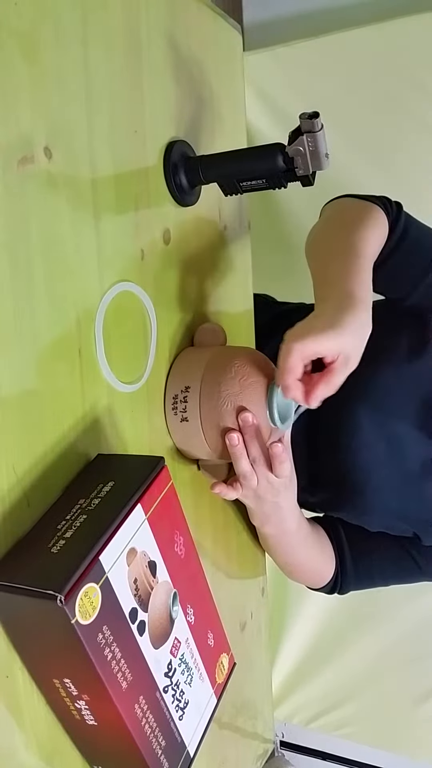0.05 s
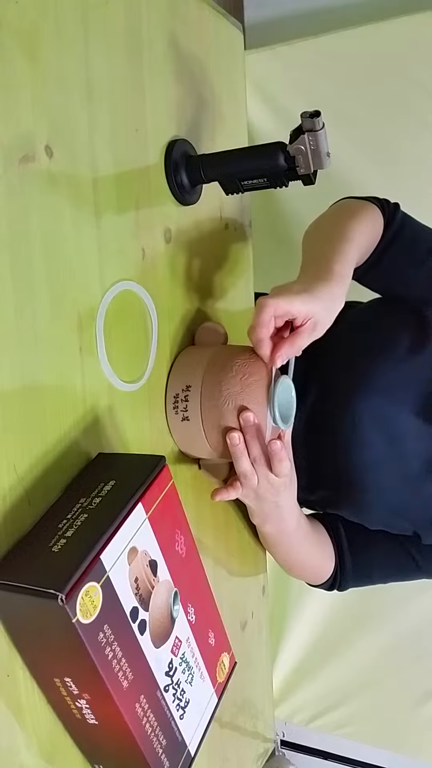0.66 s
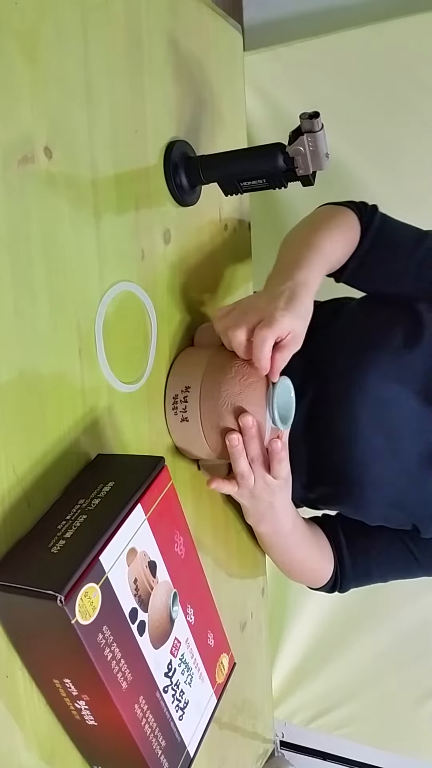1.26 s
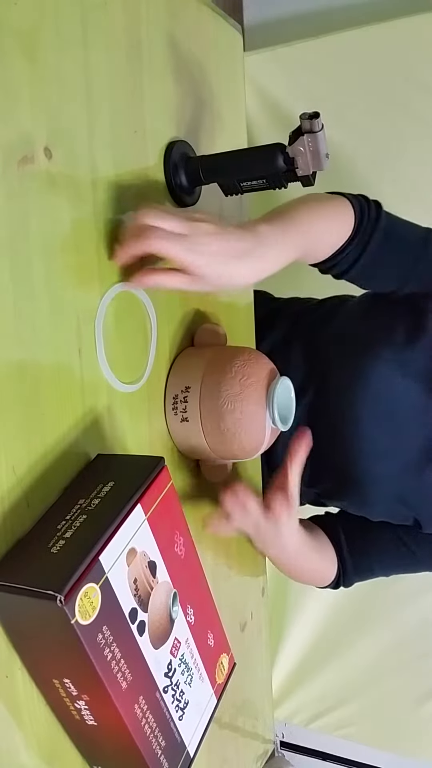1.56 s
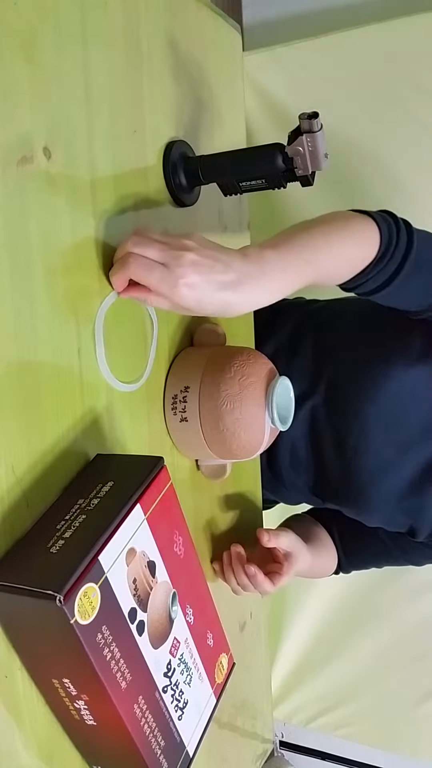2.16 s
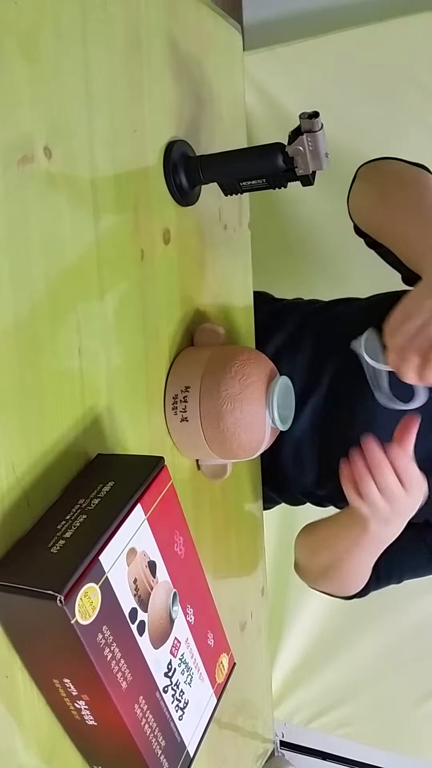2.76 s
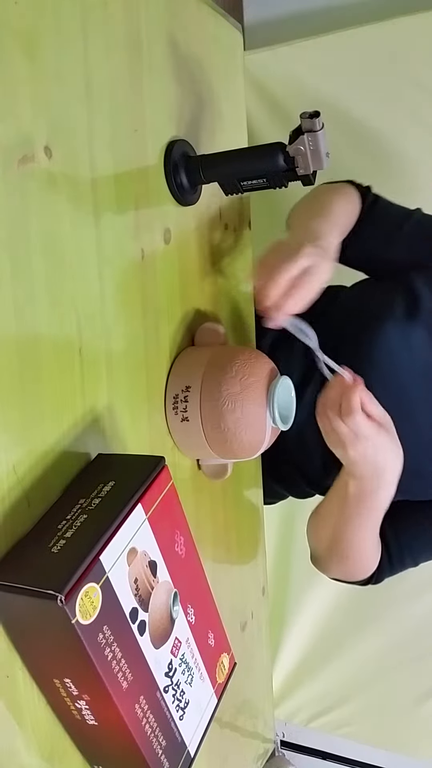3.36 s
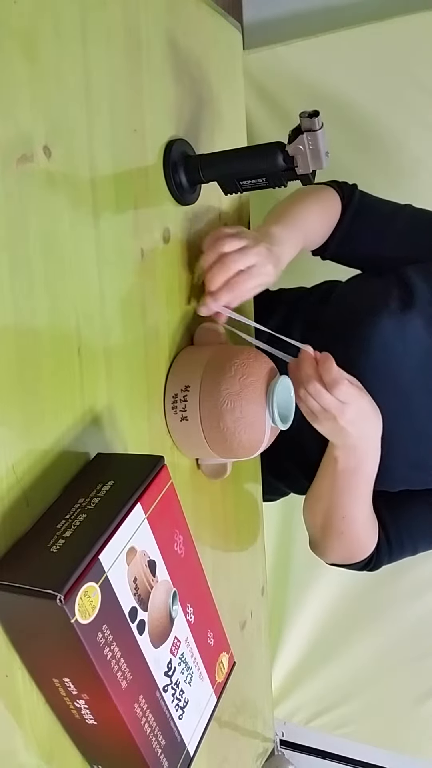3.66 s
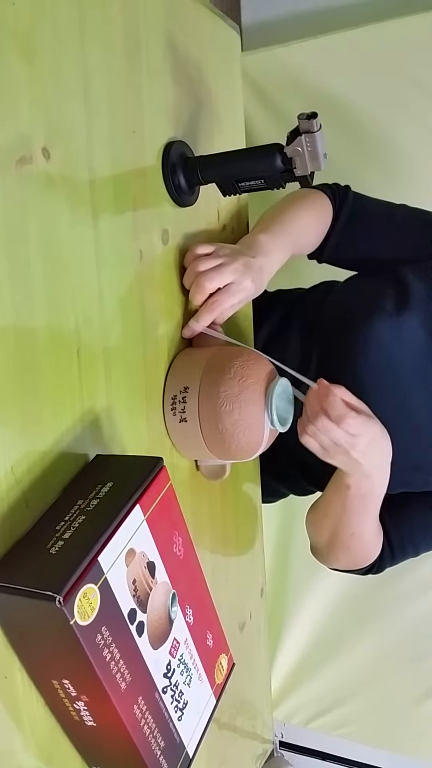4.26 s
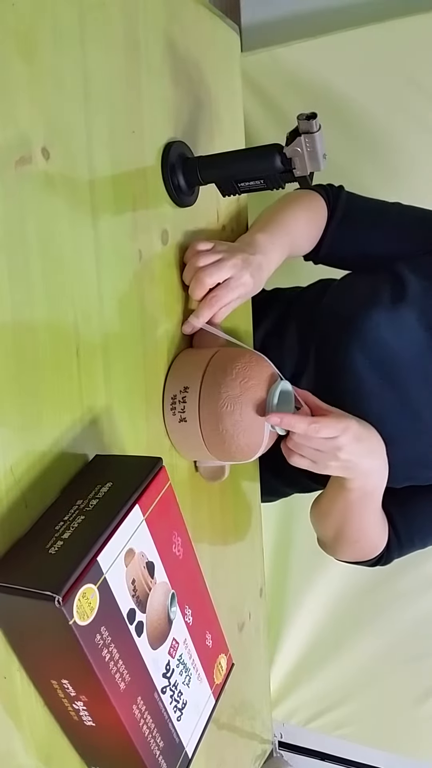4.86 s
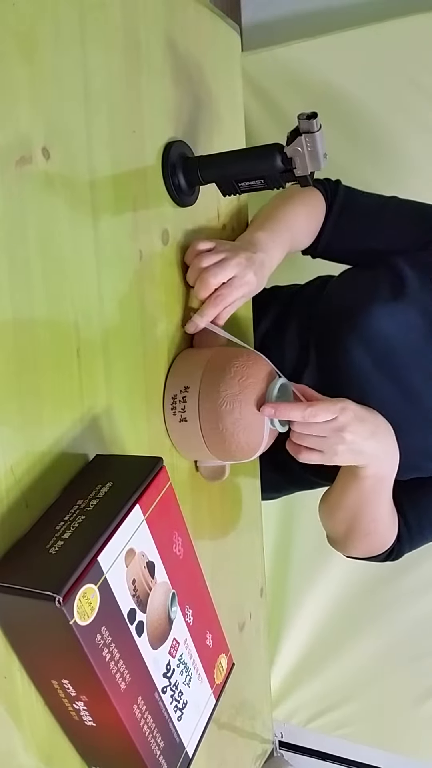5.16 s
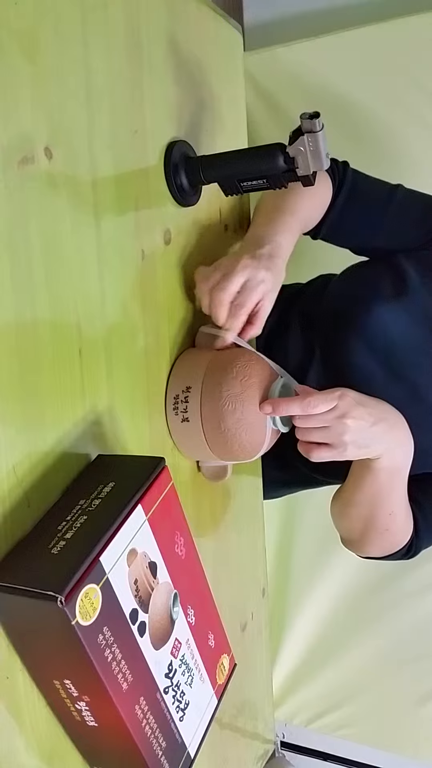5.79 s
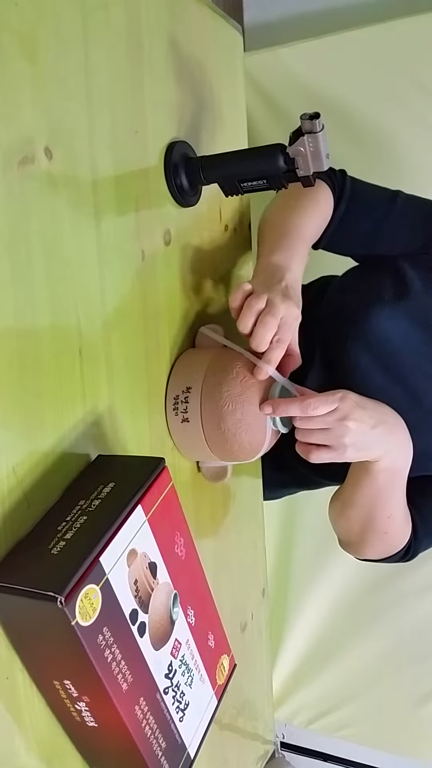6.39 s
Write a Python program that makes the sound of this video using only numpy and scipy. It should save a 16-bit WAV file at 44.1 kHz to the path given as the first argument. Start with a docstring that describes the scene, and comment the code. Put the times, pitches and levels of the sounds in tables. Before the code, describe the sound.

A rubber band snaps off a clay pot, then the lid scrapes and clinks and the pot knocks on a wooden table.

```python
"""In a small, faintly humming room a far clock ticks. A rubber band slides off a lidded clay pot and snaps
free, thudding the pot on its wooden table; two dull bumps come through the microphone stand. A second band
is stretched over the pot: under its pull the lid grates and clinks on its rim, and the pot judders, tips
and knocks back on the table, the room ringing briefly. Last, the band rubs up over the hollow clay,
with one more bump and a few light knocks."""
import sys
import numpy as np
from scipy import signal
from scipy.fft import rfft, irfft, next_fast_len
from scipy.io import wavfile
from scipy.ndimage import map_coordinates

SR = 44100
rng = np.random.default_rng(int(sys.argv[2]) if len(sys.argv) > 2 else 0)


def unload_audio(sound):
    """Save the sound as a 16-bit wav file, at the path given as the first command line argument."""
    columns = np.transpose(np.atleast_2d(sound))
    # keep every value between -1 and 1, then stretch to whole-number steps
    steps = np.round(np.clip(columns, -1, 1) * 32767)
    wavfile.write(sys.argv[1], SR, steps.astype(np.int16))


N = 283563
T = np.arange(SR // 2) / SR  # seconds after a contact
ECHO_S, ECHO_DB = 0.021, -7  # a softer echo follows 21 ms later
HARD_BLOW_DB = -19.5  # the blow at which rattle and woody edge have their stated levels

# Tone of rubber brushing clay. Each row: frequency in Hz, noise level in dB.
RUBBER_SWISH = [(500, 14.5), (2400, -3.5), (3100, -11.5), (3800, -4.5), (5500, -8.5), (7000, 0.5),
                (8800, -0.5), (11500, -9), (14500, -11)]
# Tone of grains crushed on clay. Each row: frequency in Hz, noise level in dB.
CLAY_RASP = [(1500, 1.5), (2500, 3), (3500, -7.5), (4500, -7.5), (5200, 1), (6000, -16.5), (7300, -8.5),
             (8500, 8), (9300, -10), (11300, -13.5), (12300, 2.5), (13200, -7), (14600, -9)]
# Stereo image of reverb, rattle and woody edge. Each row: frequency in Hz, left-right likeness (1 is mono).
STEREO_LIKENESS = [(150, 0.84), (500, 0.95), (900, 0.59), (1600, 0.61), (3000, 0.018)]


def amp(db):
    """Decibels to gain."""
    return 10 ** (np.asarray(db) / 20)


def unit(x):
    """Scale to rms 1."""
    return x / np.sqrt(np.mean(x ** 2) + 1e-20)


def burst(x, axis=None):
    """Scale a short sound to the energy of 30 ms at rms 1."""
    return x / np.sqrt(np.mean(x ** 2, axis=axis, keepdims=True) * x.shape[-1] / (.03 * SR) + 1e-20)


def along(points, hz):
    """Read a curve of (Hz, value) points on a log frequency axis."""
    freqs, values = np.transpose(points)
    return np.interp(np.log(hz + 1), np.log(freqs + 1), values)


def fade(t60):
    """Decay by 60 dB in t60 seconds."""
    return amp(-60 * T / t60)


def swell(rise):
    """Force of a contact: it peaks after rise seconds, then lets go."""
    u = T / rise
    return u * np.exp(1 - u)


def wobble(rate):
    """A smooth random curve, rate knots a second."""
    return map_coordinates(rng.standard_normal(512), [np.arange(N) * rate / SR], mode="wrap")


def strokes(rows, attack_s, release_s):
    """One envelope per level column: each stroke rises, holds, then falls 60 dB in the release time."""
    t, total = np.arange(N) / SR, 0
    for start, length, *levels_db in rows:
        attack = np.clip((t - start) / attack_s, 0, 1)
        release = amp(-60 * np.maximum(t - start - length, 0) / release_s)
        total = total + np.outer(amp(levels_db), attack * release)
    return total


def add(track, s, x):
    """Mix x into the track at s seconds."""
    start = round(s * SR)
    part = track[:, start:start + x.shape[-1]]
    part += x[..., :part.shape[1]]


def filtered(x, response):
    """Zero-phase EQ; response gives the gain at each frequency."""
    size = next_fast_len(x.shape[-1] + SR // 4)
    gain = response(np.fft.rfftfreq(size, 1 / SR))
    return irfft(rfft(x, size) * gain, size)[..., :x.shape[-1]]


def coloured(x, tone, size=2048):
    """Minimum-phase EQ along (Hz, dB) points, so that attacks stay sharp."""
    cepstrum = irfft(np.log(amp(along(tone, np.fft.rfftfreq(size, 1 / SR)))))
    cepstrum[1:size // 2] *= 2
    cepstrum[size // 2 + 1:] = 0
    impulse = irfft(np.exp(rfft(cepstrum)))
    return signal.fftconvolve(x, impulse[None], axes=1)[:, :x.shape[1]]


def paired(x, likeness):
    """Blend two unrelated signals into left and right of a given likeness."""
    turn = lambda hz: np.arccos(along(likeness, hz)) / 2
    mid, side = filtered(x, lambda hz: np.array([np.cos(turn(hz)), np.sin(turn(hz))]))
    return np.array([mid + side, mid - side])


def puff(tone, rise):
    """A short burst of coloured stereo noise."""
    return burst(coloured(rng.standard_normal((2, len(T))) * swell(rise), tone))


def grit(size, rate):
    """Tiny random impacts of clay grains, rate a second."""
    return (rng.random((2, size)) < rate / SR) * rng.standard_normal((2, size))


def room_tone(hum_hz=119, hum_db=-65, left_db=-55.5, right_db=-57.5):
    """Low room noise with the slightly unsteady hum of an appliance."""
    # Tone of the still air. Each row: frequency in Hz, noise level in dB.
    air_tone = [(12, -41), (20, -1), (87, -7.5), (121, -3), (147, -13), (347, -18), (470, -22),
                (774, -32.5), (865, -33), (1050, -37), (1780, -38.5), (2300, -42), (3100, -55),
                (5000, -47.5), (5900, -70.5), (6700, -48), (8000, -47.5), (10300, -57), (12300, -51.5),
                (15000, -56.5)]
    # Its stereo image. Each row: frequency in Hz, left-right likeness.
    air_likeness = [(30, 0.042), (90, 0.038), (170, 0.48), (500, 0.27), (1000, 0), (2000, 0)]
    noise = paired(rng.standard_normal((2, N)), air_likeness)
    air = unit(filtered(noise, lambda hz: amp(along(air_tone, hz))))
    hum = np.sqrt(2) * np.sin(2 * np.pi * hum_hz * np.arange(N) / SR + .5 * wobble(rate=5))
    return amp([[left_db], [right_db]]) * air + amp(hum_db) * hum


def clock(first_s=.31, tick_db=-67):
    """One tick a second, so distant that it arrives as a soft smear."""
    # Tone of a tick. Each row: frequency in Hz, noise level in dB.
    tick_tone = [(400, -25), (880, 6.5), (1150, -2), (1400, 3), (1700, -3), (2100, 3.5), (2700, -13.5),
                 (5000, -21), (5900, -42), (7500, -29), (14000, -39)]
    out = np.zeros((2, N))
    smear = swell(rise=.055) ** 2.5
    for s in np.arange(first_s, N / SR, 1):
        noise = unit(coloured(rng.standard_normal((2, len(T))), tick_tone))
        add(out, s, amp(tick_db) * smear * noise)
    return out


def band_slides():
    """The loosened band slides over the clay with a grainy swish."""
    # Each row: start in seconds, length in seconds, level in dB.
    slides = [(0.61, 0.087, -71.5), (0.86, 0.2, -66), (1.17, 0.25, -67.5), (1.55, 0.33, -78.5)]
    envelope, = strokes(slides, attack_s=0.05, release_s=0.83)
    return envelope * unit(coloured(grit(N, rate=2800), RUBBER_SWISH))


def table_ring(blow_hz, push=2.14, focus=1.0):
    """A brief shove, then the modes of pot and table, favouring those near the pitch of the blow."""
    # Modes of pot and table top together. Each row: frequency in Hz, level in dB, 60 dB decay in seconds.
    table_modes = [(150, -17, .2), (176, -12, .22), (207, -6, .26), (258, 0, .18), (278, -2, .09),
                   (297, 1, .19), (375, -13, .18), (460, -7, .14), (529, -4, .16), (590, -12, .14),
                   (630, -13, .15), (756, -8, .17), (810, -14, .14), (955, -16, .14), (1036, -12, .13),
                   (1256, -13, .22), (1398, -16, .18)]
    hz, db, t60 = np.transpose(table_modes)[:, :, None]
    gain = amp(db + rng.standard_normal(hz.shape)) / np.hypot(1, focus * (hz / blow_hz - blow_hz / hz))
    modes = np.sum(gain * fade(t60) * np.sin(2 * np.pi * hz * T), axis=0)
    cycles = T * blow_hz
    shove = push * swell(.5 / blow_hz) * np.sin(2 * np.pi * cycles)
    # the table gives way too little to radiate deep bass
    low_cut = signal.butter(3, 130, "highpass", fs=SR, output="sos")
    return burst(signal.sosfilt(low_cut, modes * (1 - np.exp(-cycles)) + shove))


def table_blow(db, hz, edge_db=-25, edge_growth=1.24):
    """One blow on the table: its modes and a short woody edge that grows with the force."""
    # Tone of the woody edge. Each row: frequency in Hz, noise level in dB.
    edge_tone = [(120, -17), (250, -0.5), (550, 10), (800, -2.5), (1400, -18), (2200, -15), (3200, -38.5),
                 (6000, -63), (15000, -73)]
    edge = burst(paired(puff(edge_tone, rise=0.0022), STEREO_LIKENESS))
    return amp(db) * table_ring(hz) + amp(edge_db + edge_growth * (db - HARD_BLOW_DB)) * edge


def table_knocks(rattle_db=-27.5, wall_db=-33.5, rattle_growth=1.9):
    """Each knock has one quick, softer echo; the harder it is, the more the lid rattles and rings the pot."""
    # Pot and hands hit the table. Each row: start in seconds, level in dB, pitch of the blow in Hz.
    knocks = [(0.636, -59.5, 193), (1.335, -56.5, 228), (1.465, -52, 185), (2.191, -55.5, 300),
              (4.284, -53.5, 196), (4.353, -46, 190), (4.4999, -28.5, 253), (5.116, -39, 202),
              (5.2105, -20, 277), (6.289, -52, 342), (6.335, -53, 290), (6.421, -51, 257)]
    # Tone of the lid jumping in its seat. Each row: frequency in Hz, noise level in dB.
    rattle_tone = [(150, -28.5), (300, 3.5), (520, 2.5), (760, -3.5), (1000, -8), (1300, -9), (1650, -17),
                   (2400, -21.5), (3200, -36.5), (6000, -50)]
    out = np.zeros((2, N))
    for s, db, hz in knocks:
        rattle = amp(rattle_db) * burst(paired(puff(rattle_tone, rise=0.012), STEREO_LIKENESS))
        wall = amp(wall_db) * table_ring(blow_hz=1160, push=0, focus=0.72)
        jump = amp(rattle_growth * (db - HARD_BLOW_DB))
        add(out, s, table_blow(db, hz) + jump * (rattle + wall))
        add(out, s + ECHO_S, table_blow(db + ECHO_DB, hz))
    return out


def band_snaps(recoil_slower=4.9, recoil_db=-7, slap_growth=1.64):
    """The band whips free with a bright hiss, slaps and jolts the pot, then recoils slower and softer."""
    # Each row: start in seconds, snap, swish and thud levels in dB, thud pitch in Hz, rise in seconds.
    snaps = [(0.697, -43.5, -66, -35, 263, 0.0059), (0.9684, -44, -50, -35, 260, 0.0019),
             (1.2126, -64.5, -55, -50, 205.3, 0.0014), (1.678, -75.5, -66.5, -43, 200, 0.0036)]
    # Tone of the snap. Each row: frequency in Hz, noise level in dB.
    snap_tone = [(150, -52), (600, 9.5), (1100, -4.5), (2000, -19), (2650, -10), (3100, -42), (3800, -16.5),
                 (5500, -27), (7200, -11.5), (8800, -2.5), (11500, -7), (14500, -16)]
    # Tone of rubber striking the pot's wall. Each row: frequency in Hz, noise level in dB.
    slap_tone = [(400, 5), (900, -2), (1300, -1), (1750, 10), (2600, -8), (3100, -30), (4400, -18),
                 (9000, -33)]
    out = np.zeros((2, N))
    for s, snap_db, swish_db, thud_db, hz, rise in snaps:
        recoil_s = recoil_slower * rise
        slap_db = -55 + slap_growth * (thud_db + 32)  # -55 dB with a strong thud of -32 dB
        for at, gain, width in [(s, 1, rise), (s + recoil_s, amp(recoil_db), recoil_s)]:
            hiss = amp(snap_db) * puff(snap_tone, width) + amp(swish_db) * puff(RUBBER_SWISH, width)
            slap = amp(slap_db) * puff(slap_tone, width)
            add(out, at, gain * (hiss + slap))
        thud = amp(thud_db) * table_ring(hz, push=0.61, focus=2.5)
        add(out, s - .001, thud)
        add(out, s + ECHO_S, amp(ECHO_DB) * thud)
    return out


def stand_bumps():
    """The microphone stand sways for a cycle or two: a dull bump, mostly on the left."""
    # Each row: start in seconds, left level in dB, pitch in Hz, drop on the right in dB.
    bumps = [(1.802, -27, 69.5, 7.5), (2.321, -39.5, 60.4, 13), (6.248, -21.5, 92.5, 26)]
    out = np.zeros((2, N))
    for s, db, hz, drop_db in bumps:
        u = T * hz / 0.64  # the sway is widest after 0.64 cycles
        sway = u ** 2 * np.exp(2 - 2 * u) * np.sin(2 * np.pi * hz * T)
        add(out, s, amp([[db], [db - drop_db]]) * sway)
    return out


def lid_ring(force, low_db, crack_db=-21, size=3072):
    """A stereo force rings each mode of the lid; some of it is heard directly as grit."""
    # Modes of the fired clay lid. Each row: frequency in Hz, level in dB, 60 dB decay in seconds.
    lid_modes = [(4570, -3, .02), (4700, -5, .012), (5150, -8, .008), (8130, -2, .012), (8380, -2, .009),
                 (8760, -8, .009), (9680, -8, .02), (10620, -4, .02), (12080, 0, .015), (12290, -2, .013),
                 (13550, -17, .007), (14520, -15, .009)]
    hz, db, t60 = np.transpose(lid_modes)[:, :, None]
    rings = (T * fade(t60))[:, :size] * np.sin(2 * np.pi * hz * T[:size])  # each builds up, then dies
    modes = signal.fftconvolve(force[:, None], rings[None], axes=2)[..., :force.shape[1]]
    gain = amp(db + low_db * (hz < 6000))
    ringing = burst(np.sum(gain * burst(modes, axis=-1), axis=1))
    return ringing + amp(crack_db) * burst(force)


def lid_grinds(scrape_over_rasp_db=4):
    """The lid grinds on its rim: crushed grains ring it, rasp dryly and sound the hollow pot."""
    # Each row: start in seconds, length in seconds, ring level in dB, rasp level in dB.
    grinds = [(4.265, 0.12, -82, -83), (4.37, .1, -66.5, -92), (4.495, 0.026, -48.5, -81),
              (4.58, 0.23, -88, -74), (5.045, 0.11, -57, -56.5), (5.175, 0.022, -41, -40.5),
              (5.31, 0.069, -73, -59)]
    # Tone of the pot under the grinding lid. Each row: frequency in Hz, noise level in dB.
    scrape_tone = [(250, -5), (600, 5.5), (1000, 0), (1450, -5.5), (2000, -5.5), (2600, -16), (3300, -25),
                   (6000, -43)]
    ring_gain, rasp_gain = strokes(grinds, attack_s=0.0056, release_s=0.19)
    ring = unit(lid_ring(grit(N, rate=600), low_db=-9, crack_db=-33))
    rasp = unit(coloured(grit(N, rate=2000), CLAY_RASP))
    scrape = amp(scrape_over_rasp_db) * unit(coloured(grit(N, rate=480), scrape_tone))
    return ring_gain * ring + rasp_gain * (rasp + scrape)


def lid_clinks(even_db=-53, clack_growth=0.83, size=6144):
    """Each touch on the rim is a short skid over grains that rings the lid and the hollow beneath it."""
    # Each row: start in seconds, level in dB, trim of the lowest modes in dB, rise in seconds.
    clinks = [(4.349, -63.5, 6.5, 0.0039), (4.3712, -52.5, -3, 0.0017), (4.441, -62, -5, 0.003),
              (4.4867, -45.5, -1, 0.0027), (4.654, -70, -14, 0.0035), (4.727, -67, -20, 0.0029),
              (4.951, -82.5, -1, 0.0021), (5.063, -50.5, -6, 0.0024), (5.112, -59, -8, 0.0012),
              (5.1311, -47, -3.5, 0.0015), (5.177, -47, -6, 0.0044), (5.584, -73.5, -0.5, 0.0013),
              (6.331, -76, -10, 0.0017)]
    # Tone of the hollow clack. Each row: frequency in Hz, noise level in dB.
    clack_tone = [(300, -7), (1050, -0.5), (1550, 21), (2050, 10.5), (2600, -11), (3300, -15), (6000, -45),
                  (14000, -37)]
    out = np.zeros((2, N))
    for s, db, low_db, rise in clinks:
        skid = grit(size, rate=4500) * swell(rise)[:size]
        add(out, s, amp(db) * lid_ring(skid, low_db))
        clack_db = even_db + clack_growth * (db - even_db)  # as loud as the clink at even_db
        add(out, s, amp(clack_db) * puff(clack_tone, rise))
    return out


def pot_judders(growth_db=6.5, scatter_periods=0.084):
    """Dragged by the band, the pot sticks and slips on the table in a quick run of ever stronger blows."""
    # Each row: start in seconds, length in seconds, last slip's level in dB, slip rate and pitch in Hz.
    judders = [(4.447, .018, -51, 280), (5.054, .019, -33.5, 175), (5.177, .017, -27.5, 190),
               (5.804, .03, -50, 188)]
    out = np.zeros((2, N))
    for start, length, db, hz in judders:
        count = round(length * hz) + 1
        for k, below_db in enumerate(np.linspace(growth_db, 0, count)):
            s = start + (k + scatter_periods * rng.standard_normal()) / hz
            add(out, s, table_blow(db - below_db, hz))
    return out


def band_rubs(pressure_db=2.5):
    """The stretched band rubs up the side of the pot under an unevenly pressing hand."""
    # Each row: start in seconds, length in seconds, hollow rub level in dB, fine grating level in dB.
    rubs = [(5.5, 0.25, -64.5, -79), (5.81, 0.023, -51, -68.5), (5.92, 0.29, -56.5, -81),
            (6.28, 0.17, -56.5, -73.5)]
    # Tone of the rubbed pot. Each row: frequency in Hz, noise level in dB.
    hollow_tone = [(200, 14.5), (700, 3.5), (1400, -5.5), (1620, 1.5), (1750, 5), (1900, -14.5),
                   (2400, -29.5), (3300, -30), (6500, -28.5), (8800, -12.5), (11000, -24), (14000, -26)]
    hollow_gain, grating_gain = strokes(rubs, attack_s=0.028, release_s=0.56)
    hollow = unit(coloured(grit(N, rate=1500), hollow_tone))
    grating = unit(coloured(grit(N, rate=2000), CLAY_RASP))
    pressure = amp(pressure_db * wobble(rate=22))
    return pressure * (hollow_gain * hollow + grating_gain * grating)


def room_reverb(x, early_db=-1, late_db=-3, early_t60=0.17, build_s=0.014):
    """Dense reflections off the near walls, then a longer tail."""
    # Ring of the tail. Each row: frequency in Hz, 60 dB decay in seconds.
    decay_times = [(120, 0.6), (300, 0.24), (700, 0.54), (1500, 0.68), (5000, 0.72), (12000, 0.45)]
    # EQ on the whole reverb. Each row: frequency in Hz, gain in dB.
    reverb_tone = [(150, -4.5), (420, -6), (900, -7), (2000, -2.5), (12000, -6.5)]
    hz, t, bands = signal.stft(rng.standard_normal((2, SR)), SR, nperseg=256)
    bands *= amp(-60 * t / along(decay_times, hz)[:, None])
    late = signal.istft(bands, SR, nperseg=256)[1][:, :len(T)]
    early = rng.standard_normal((2, len(T))) * fade(early_t60)
    echoes = amp(early_db) * early / np.linalg.norm(early[0])
    echoes += amp(late_db) * late / np.linalg.norm(late[0])
    echoes = paired(echoes * np.minimum(T / build_s, 1), STEREO_LIKENESS)
    return signal.fftconvolve(x, coloured(echoes, reverb_tone), axes=1)[:, :N]


def scene():
    """The pot's sounds fill the room and reach left and right in different colours, over the backdrop."""
    # Panning of the pot and its reverb. Each row: frequency in Hz, left over right in dB.
    balance = [(100, 0), (250, -2.2), (700, -2.5), (1600, 1), (2800, 0), (3800, -10), (4600, -13),
               (6500, -9), (8000, 3), (9600, 2), (10700, 6), (12200, 6), (14500, 2)]
    direct = band_slides() + band_snaps() + lid_clinks() + lid_grinds() + band_rubs()
    direct += table_knocks() + pot_judders()
    pan = lambda hz: amp(np.outer([.5, -.5], along(balance, hz)))
    pot = filtered(direct + room_reverb(direct), pan)
    return pot + stand_bumps() + clock() + room_tone()


def record(dry):
    """A brick-wall high cut at 14.9 kHz."""
    return filtered(dry, lambda hz: hz < 14900)


dry = scene()
out = record(dry)
unload_audio(out)
```